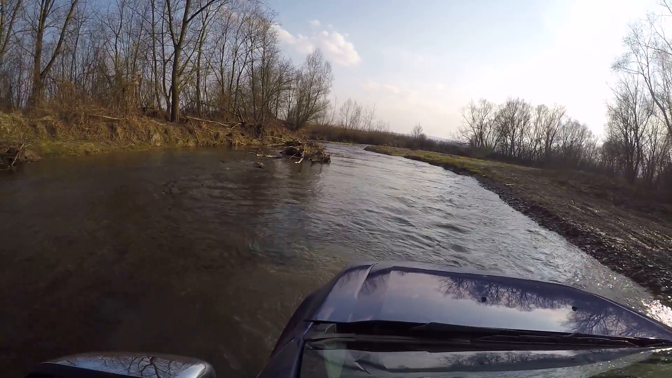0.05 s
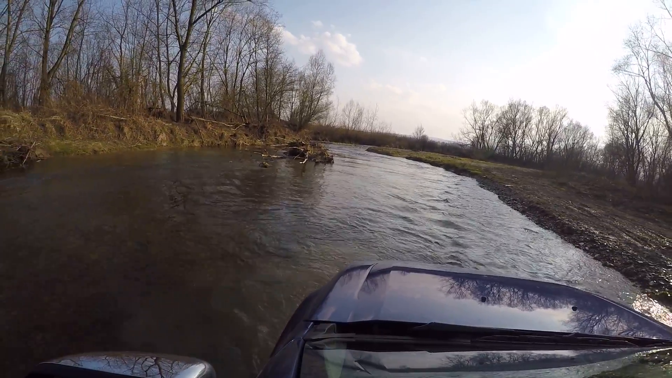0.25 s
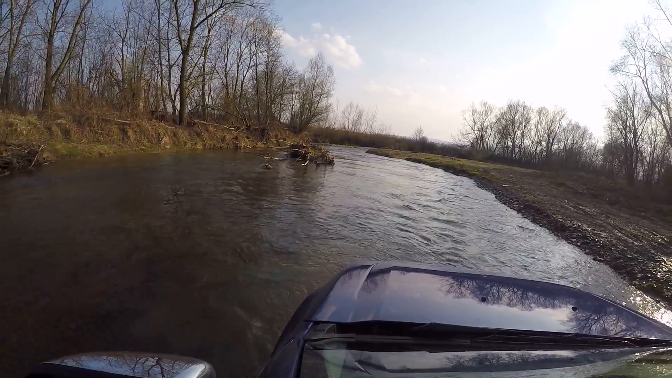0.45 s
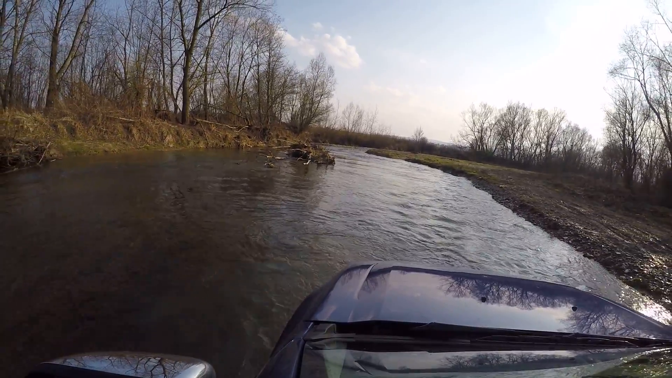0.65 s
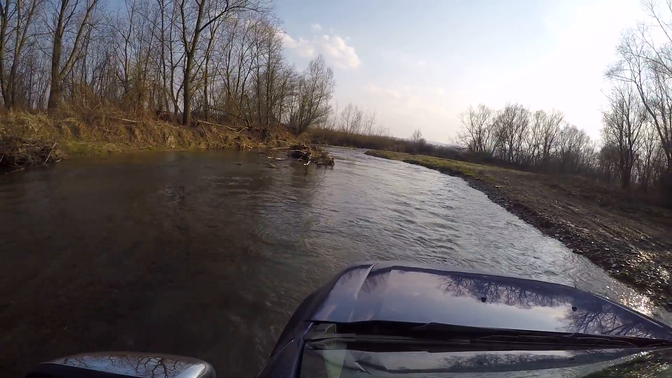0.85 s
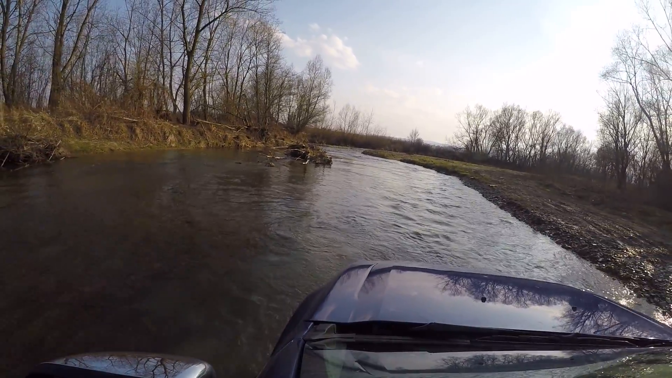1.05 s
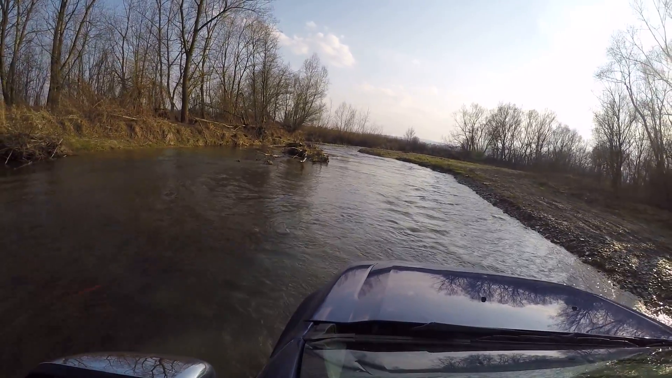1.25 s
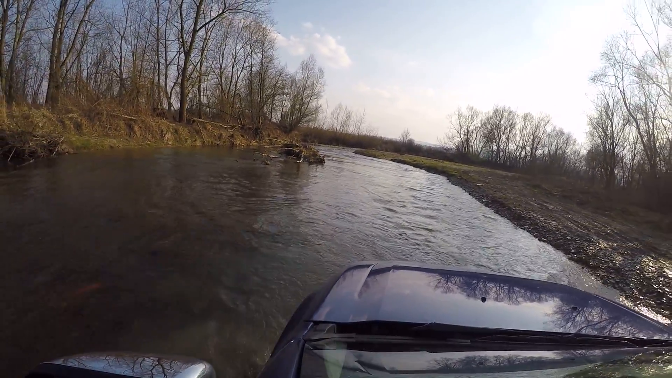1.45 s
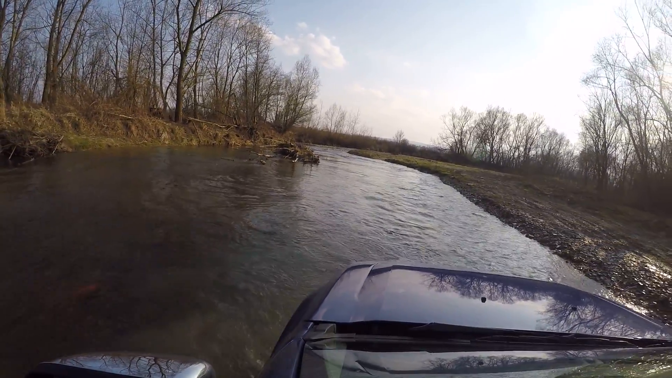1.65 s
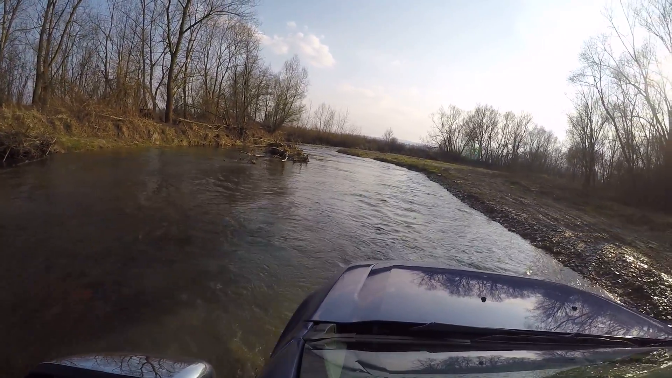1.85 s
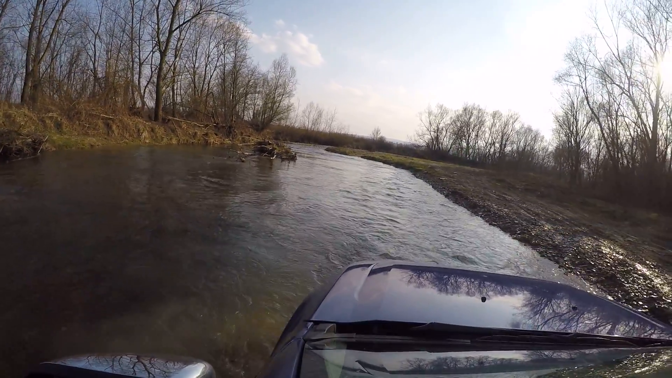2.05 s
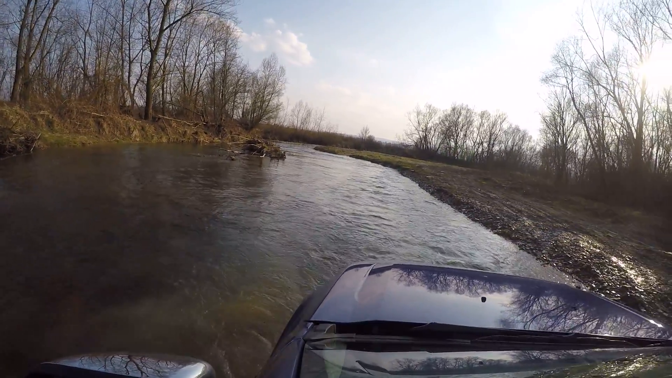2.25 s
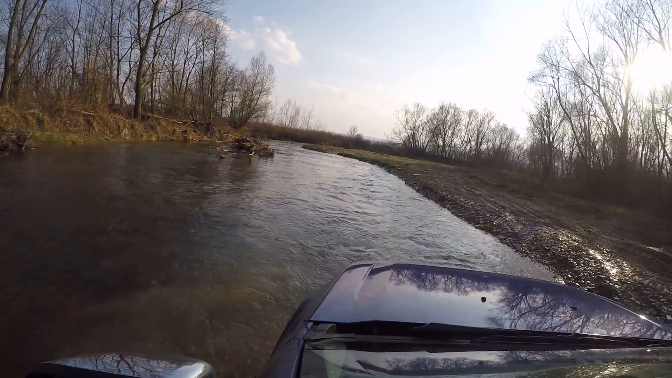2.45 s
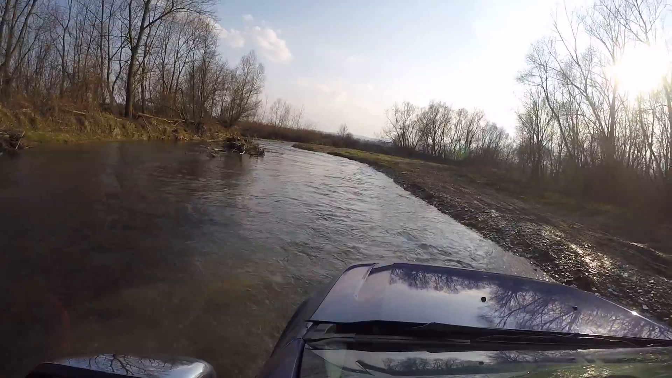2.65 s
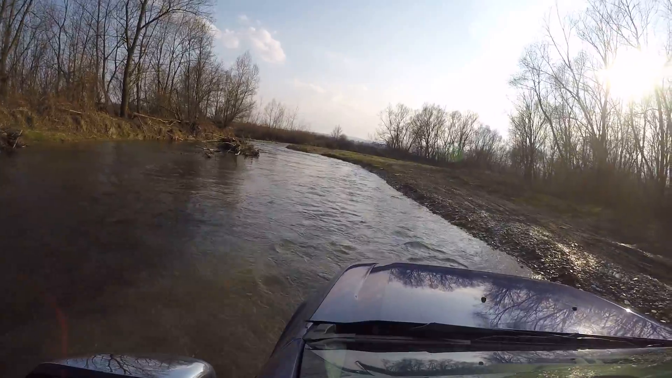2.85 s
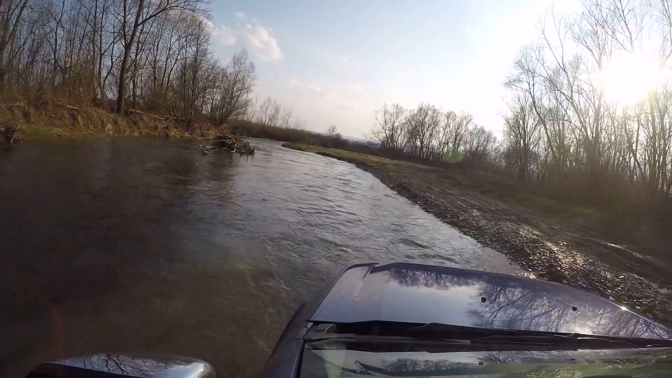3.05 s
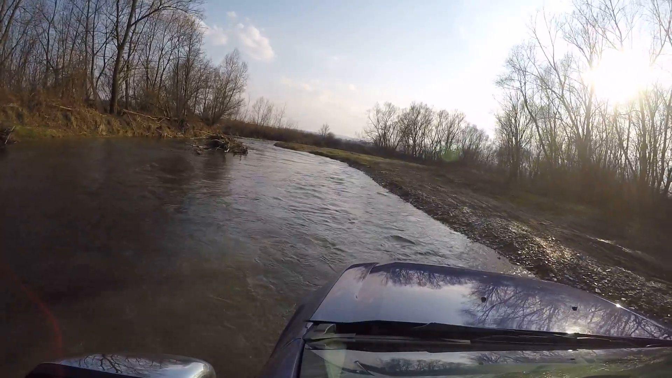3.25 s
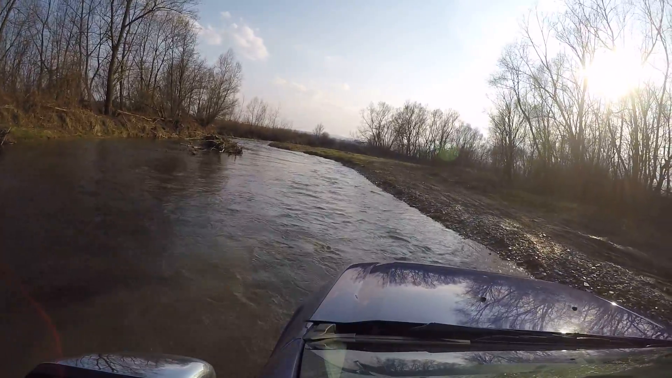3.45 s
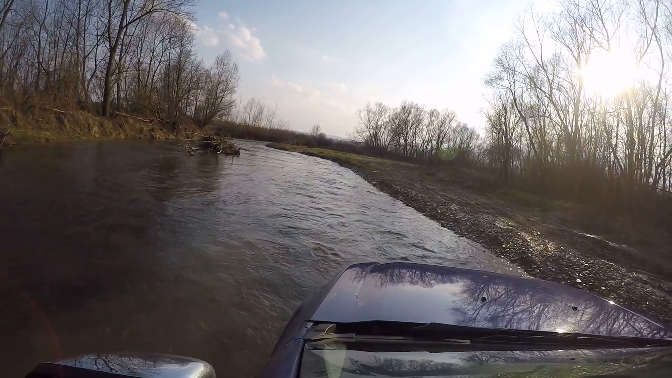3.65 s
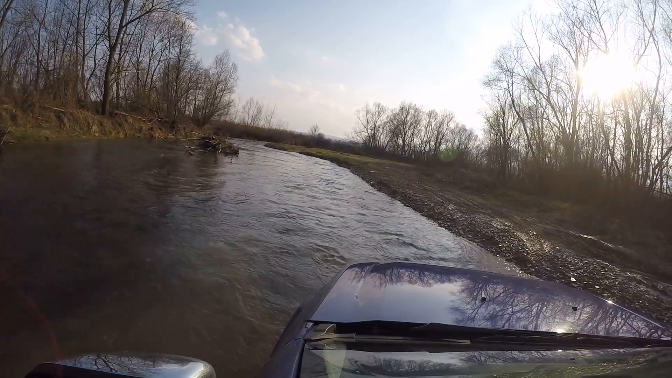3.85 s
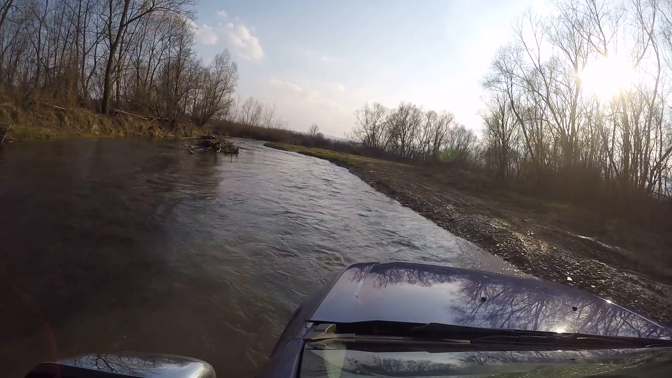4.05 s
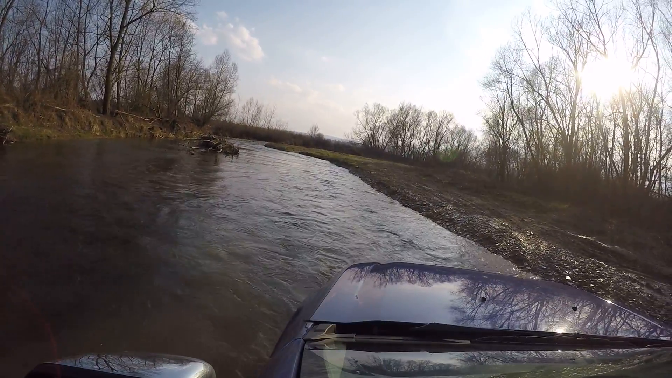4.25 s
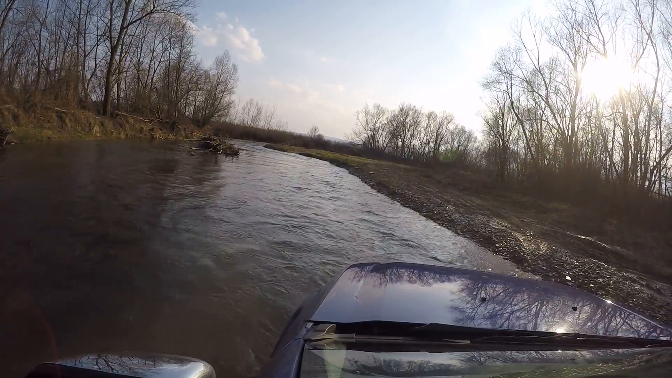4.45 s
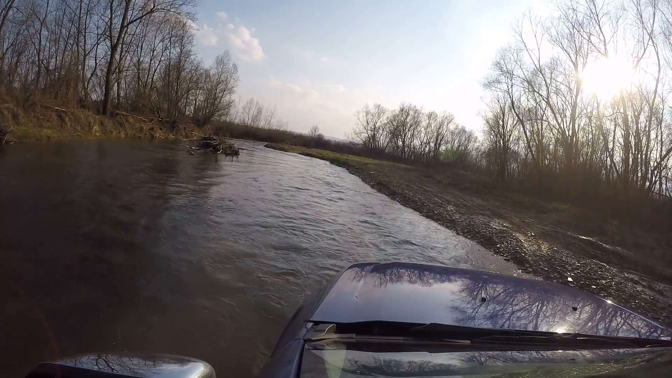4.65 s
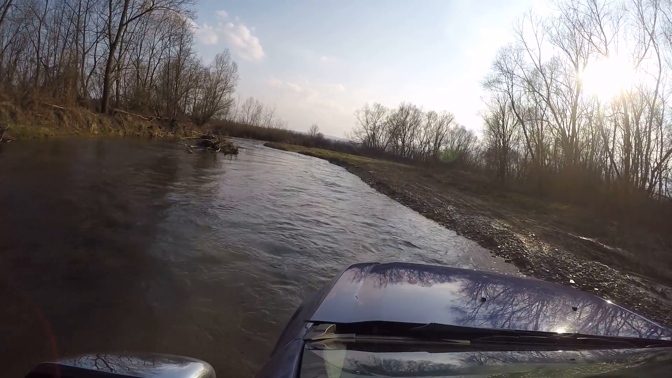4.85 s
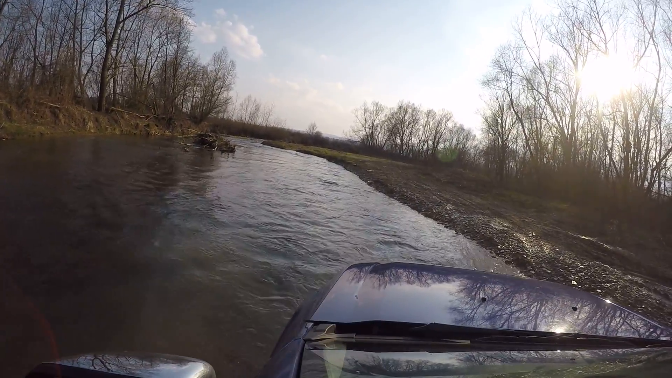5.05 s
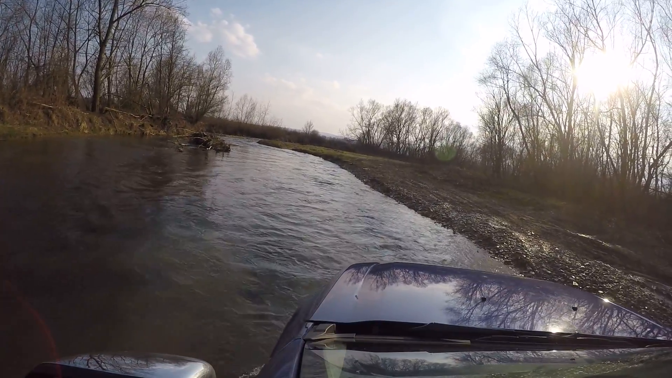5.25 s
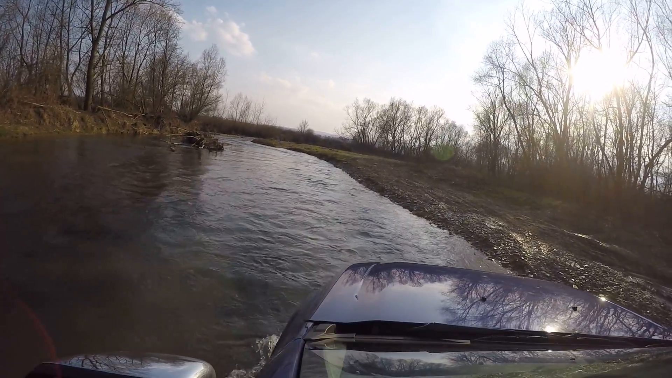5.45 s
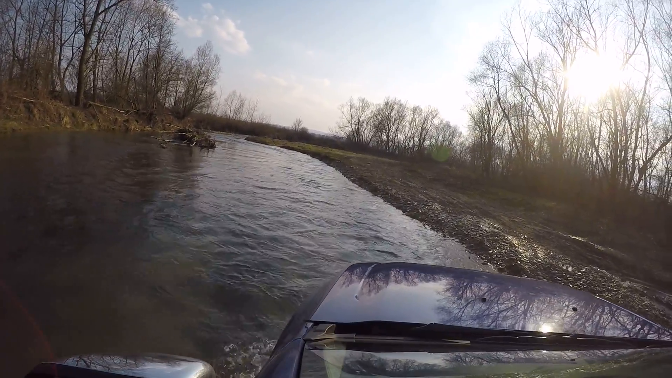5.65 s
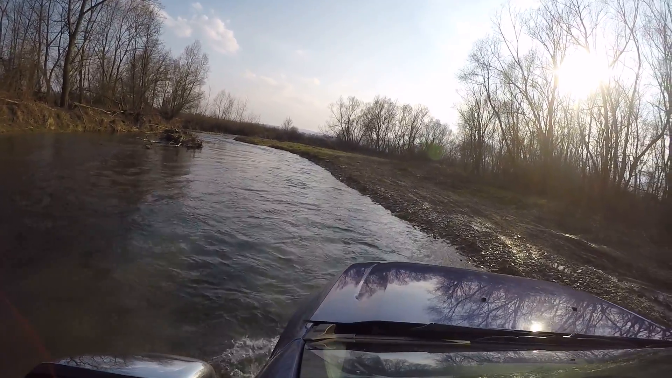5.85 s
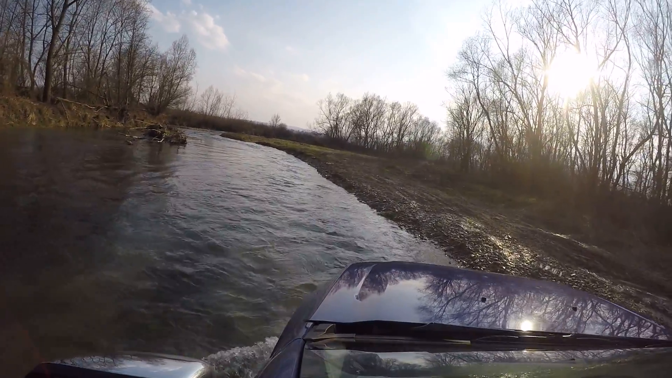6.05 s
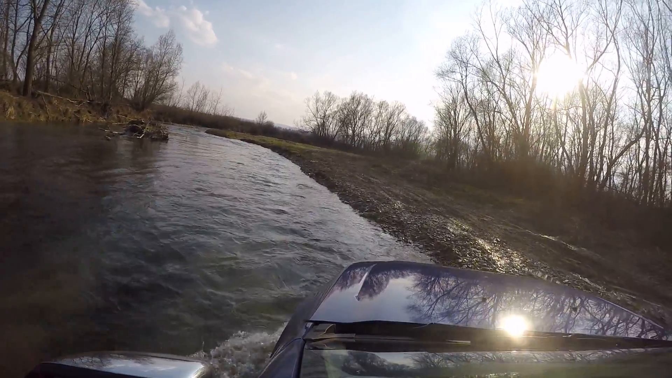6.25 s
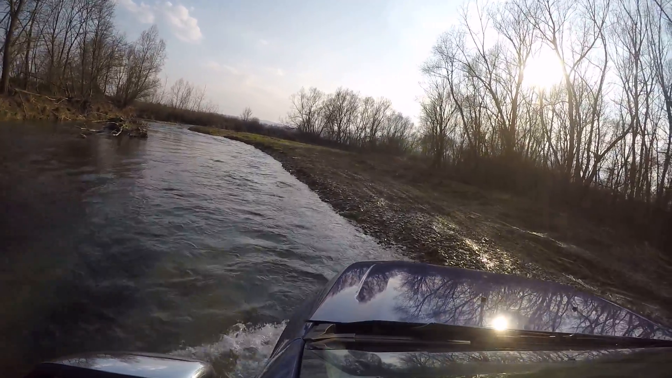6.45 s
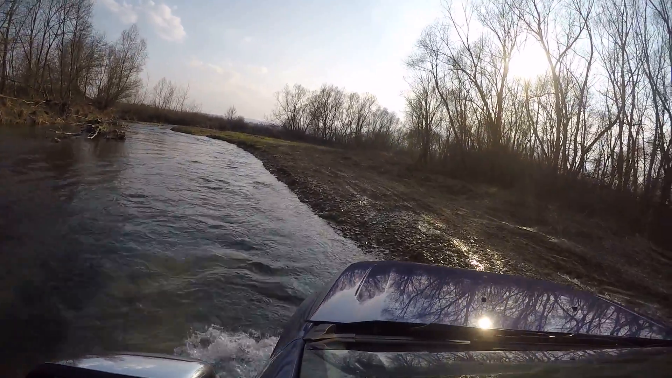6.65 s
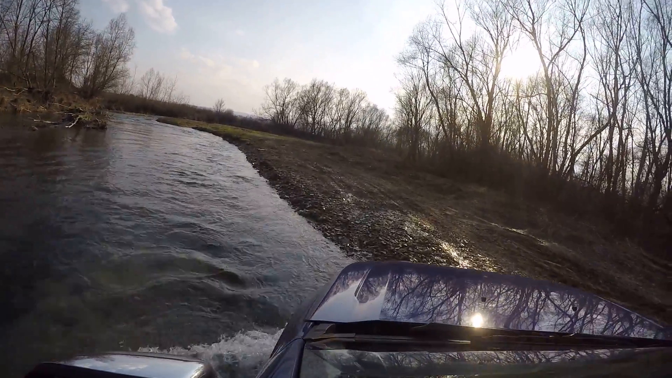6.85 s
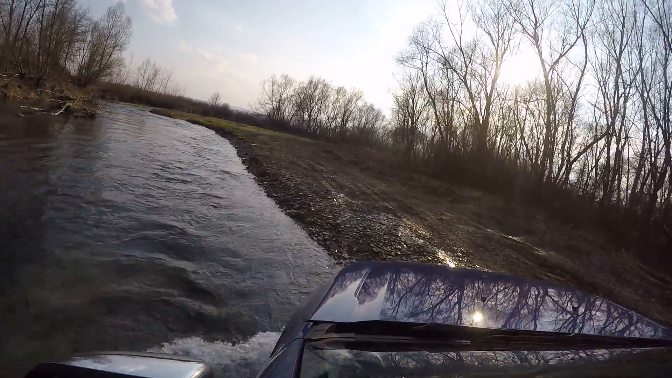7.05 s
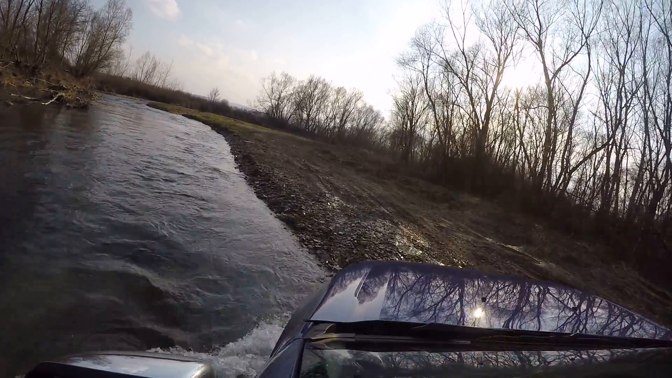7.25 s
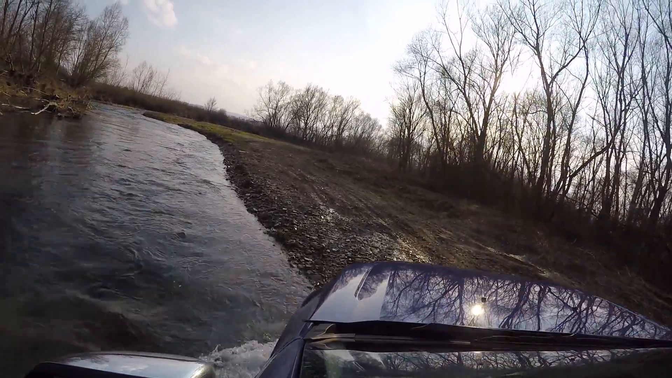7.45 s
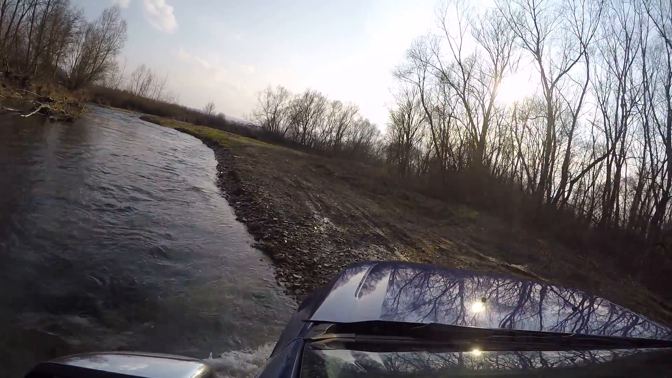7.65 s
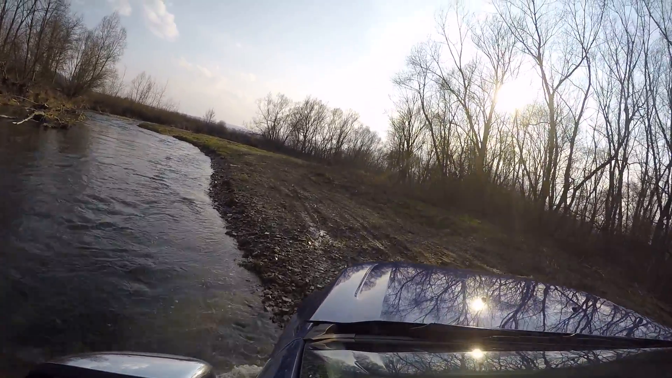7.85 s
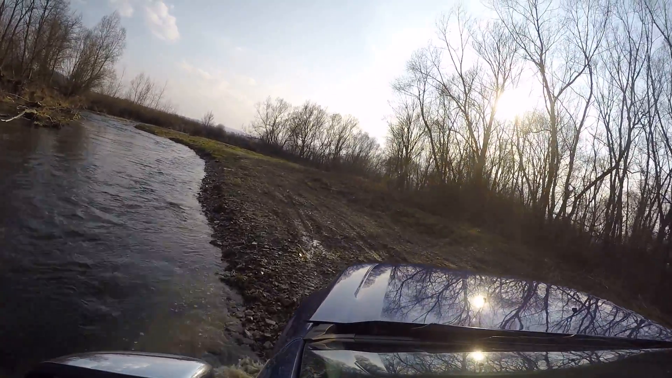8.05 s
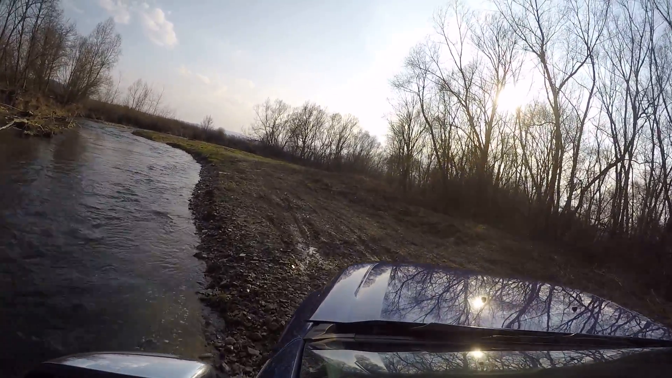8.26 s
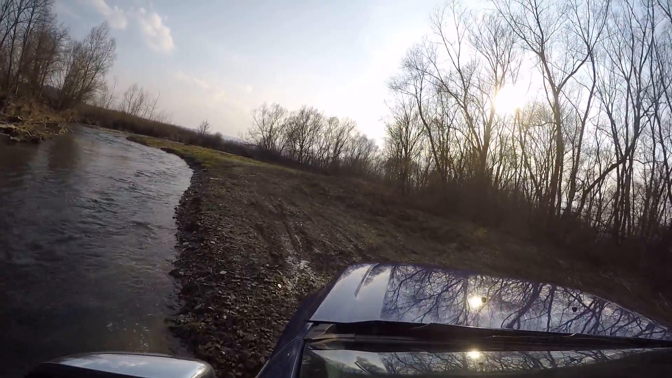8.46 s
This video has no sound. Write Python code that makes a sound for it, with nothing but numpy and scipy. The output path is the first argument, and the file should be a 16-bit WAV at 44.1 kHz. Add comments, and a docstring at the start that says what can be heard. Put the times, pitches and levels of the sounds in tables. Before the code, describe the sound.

Heard from on the truck outdoors, a deep engine throbs near idle above a low, bumpy tyre rumble. River stones give dull knocks while water only trickles and plips. After a quieter, smoother stretch around three to four seconds, the engine revs up, stones crunch and thud, and the water swells into a rushing bow wave with bright spray lasting to the end.

```python
"""An engine plods near idle over a low rumble of tyres: a pickup wades along a shallow stony river.
Each engine firing feeds a deep tone with overtones and shakes the body panels; later it pulls harder.
Shaped noise makes the tyre rumble, and short fading rings make the knocks of river stones.
Ringing bubbles and noise make the water, which swells from trickle and drips to a bow wave of spray.
Single splashes, two faint gliding whistles and a soft hiss complete the scene."""
import sys
import numpy as np
from scipy import signal
from scipy.fft import rfft, irfft, next_fast_len
from scipy.io import wavfile

SR = 44100
rng = np.random.default_rng(int(sys.argv[2]) if len(sys.argv) > 2 else 0)


def waveform_to_disk(signal):
    """Save audio, clipped to [-1, 1], as 16-bit WAV at the path in sys.argv[1]."""
    frames = np.transpose(np.atleast_2d(signal))
    scaled = np.clip(frames, -1, 1) * 32767
    samples = np.round(scaled).astype(np.int16)
    wavfile.write(sys.argv[1], SR, samples)


N = 375291   # length of the scene in samples


def from_db(db):
    """Turn decibels into a gain."""
    return 10 ** (np.asarray(db) / 20)


def rms_one(x):
    """Scale a sound to unit power."""
    return x / np.sqrt(np.mean(x ** 2) + 1e-20)


def in_time(rows):
    """Draw straight lines between the rows of a table: one curve per column, sample by sample."""
    seconds, *columns = np.transpose(rows)
    return [np.interp(np.arange(N) / SR, seconds, column) for column in columns]


def drift(rate):
    """Random wander of spread 1; a higher rate (Hz) wanders faster."""
    # computed at every 40th sample; the first 2000 values only let the filter settle
    r = np.exp(-80 * np.pi * rate / SR)
    noise = rng.standard_normal(N // 40 + 2002)
    slow = signal.lfilter([1], [1, -2 * r, r * r], noise)[2000:]
    return np.interp(np.arange(N) / 40, np.arange(len(slow)), rms_one(slow))


def colour(x, spectrum):
    """Filter a sound by a smooth curve over pitch, fading beyond its ends; unit power."""
    size = next_fast_len(N)
    hz, db = np.transpose(spectrum)
    bins = np.maximum(np.arange(size // 2 + 1) * SR / size, 1)
    gain = from_db(np.interp(np.log(bins), np.log(hz), db))
    gain *= np.minimum(bins / hz[0], 1)
    gain *= np.minimum(hz[-1] / bins, 1) ** 2
    return rms_one(irfft(rfft(x, size) * gain, size)[:N])


def resonance(x, hz, width):
    """Let a sound ring at one pitch: a two-pole resonance with gain 1 at its peak."""
    r = np.exp(-np.pi * width / SR)
    poles = [1, -2 * r * np.cos(2 * np.pi * hz / SR), r * r]
    return signal.lfilter(np.array([1, 0, -1]) * (1 - r * r) / 2, poles, x + 1e-18)


def add(out, s, sound):
    """Mix a short sound in at time s (seconds)."""
    at = max(int(s * SR), 0)
    out[at:at + len(sound)] += sound[:N - at]


def bubbles(per_s, low_hz, high_hz, sharpness, spread_db, count):
    """Bubbles and drops of random size, each ringing briefly at one of many pitches; unit power."""
    sizes = from_db(spread_db * np.minimum(rng.exponential(1, N), 4.5)) * rng.choice([-1, 1], N)
    # dividing by the root of the rate keeps dense and sparse bubbles equally strong
    clicks = sizes * (rng.random(N) < per_s / SR) / np.sqrt(per_s)
    dealt = rng.integers(0, count, N)
    pitches = np.geomspace(low_hz, min(high_hz, SR / 2), count)
    return rms_one(sum(resonance(clicks * (dealt == k), hz, hz / sharpness)
                       for k, hz in enumerate(pitches)))


# How fast the engine turns. Each row: time in seconds, firings per second.
ENGINE_SPEED = [(0, 33.1), (.85, 31.7), (1.09, 34.5), (1.99, 33.6), (2.3, 36.5), (2.96, 32.9), (3.75, 31.8),
                (4.1, 32.2), (4.3, 34.4), (4.52, 38.2), (5.12, 40.4), (5.28, 44), (5.58, 45.6),
                (5.76, 39.4), (6.03, 40.5), (6.24, 48.6), (6.71, 48.8), (7.16, 42.9), (7.75, 46.2),
                (8.1, 54.6), (8.51, 58.5)]
# How loud the deep firing tone is, with its brief dips. Each row: time in seconds, level in dB.
FIRING_TONE = [(0, -21), (.45, -29), (.62, -16.5), (.78, -37), (.97, -27), (1.06, -31), (1.2, -20.5),
               (1.4, -31), (2.2, -27), (2.48, -33), (2.85, -31.5), (3.3, -25), (4.05, -31), (4.62, -23.5),
               (5.13, -22), (5.3, -25.5), (5.7, -29.5), (5.87, -17), (6.13, -30), (6.28, -16.5),
               (6.55, -19.5), (6.78, -23.5), (6.92, -31), (7.03, -16), (7.2, -27.5), (7.5, -22),
               (7.64, -28), (7.8, -18), (8.06, -22.5), (8.25, -16.5), (8.51, -16)]
# How loud the panels drone. Each row: time in seconds, level in dB.
DRONE = [(0, -33), (.9, -39.5), (2.2, -41.5), (2.7, -47), (3.4, -61), (4.1, -52), (4.42, -41), (4.9, -35.5),
         (5.4, -30.5), (5.8, -37.5), (6.4, -31.5), (7.1, -32.5), (7.65, -38), (8.0, -29), (8.51, -28.5)]
# Exhaust overtones. Each row: multiple of the firing rate, relative level in dB.
OVERTONES = [(2, -1), (3, -12), (4, -14.5), (5, -18), (6, -12.5)]
# Body panels that the engine shakes. Each row: pitch in Hz, width in Hz, relative level in dB.
PANELS = [(160.5, 9.8, -4), (194, 12, -5), (248.6, 6.2, 0.5), (302, 19, -4.5), (349.8, 36, 2.5),
          (370.4, 17.6, 7), (427, 28, -1), (510, 38, -7.5), (562, 45, -12.5)]
IDLE_HZ, IDLE_TONE_DB = 32, -28   # firings per second and firing tone at idle
# overtones: base level at idle (dB), dB per dB of firing tone, dB per octave of revs
OVERTONE_DB, OVERTONE_FOLLOWS, OVERTONE_DB_PER_OCTAVE = -35.5, 0.3, -0.5
# flutter of the firing tone: spread on a smooth bed (dB), added spread per dB of rumble
FLUTTER_DB, FLUTTER_FOLLOWS = 0.4, 0.05


def engine(uneven_db=3.0, rough=0.16, waver_db=1.5):
    """Four cylinders fire in turn: a deep exhaust tone, its overtones, and a drone from the panels."""
    firing_hz, = in_time(ENGINE_SPEED)
    tone_db, = in_time(FIRING_TONE)
    drone_db, = in_time(DRONE)
    overtone_db = OVERTONE_DB + OVERTONE_FOLLOWS * (tone_db - IDLE_TONE_DB)
    overtone_db += OVERTONE_DB_PER_OCTAVE * revs()
    flutter_db = FLUTTER_DB + FLUTTER_FOLLOWS * bumpiness()
    firings = np.cumsum(firing_hz * (1 + .004 * drift(6))) / SR   # running count, slightly unsteady
    tone = from_db(tone_db + flutter_db * drift(2.9)) * np.sin(2 * np.pi * firings)
    overtones = np.zeros(N)
    for multiple, db in OVERTONES:
        wave = np.sin(2 * np.pi * (round(multiple) * firings + rng.random()))
        overtones += from_db(db + waver_db * drift(2.2)) * wave
    # each cylinder has its own strength, and no two firings are quite alike
    at = np.flatnonzero(np.diff(np.floor(firings)))
    cylinders_db = np.array([0.19, -0.86, 0.71, -1.7]) * uneven_db
    kicks = np.zeros(N)
    kicks[at] = from_db(np.resize(cylinders_db, len(at))) * (1 + rough * rng.standard_normal(N)[at])
    # neighbouring panels swing in opposite directions
    drone = rms_one(sum((-1) ** k * from_db(db) * resonance(kicks, hz, width)
                        for k, (hz, width, db) in enumerate(PANELS)))
    drone = signal.sosfilt(signal.butter(8, 620, fs=SR, output="sos"), drone)
    return np.sqrt(2) * (tone + from_db(overtone_db) * overtones) + from_db(drone_db) * drone


def revs():
    """Engine speed in octaves above idle."""
    return np.log2(in_time(ENGINE_SPEED)[0] / IDLE_HZ)


# How rough the river bed is under the tyres. Each row: time in seconds, rumble level in dB.
BED = [(0, -31), (.45, -28.5), (1.85, -29.5), (2.1, -31), (2.82, -30.5), (3.05, -38), (4.05, -41),
       (4.6, -38), (5.0, -31), (5.55, -30), (5.85, -24.5), (6.65, -23.5), (7.15, -24.5), (7.6, -24.5),
       (8.0, -20.5), (8.51, -23)]
# How strongly the truck rocks. Each row: time in seconds, level in dB.
SWAY = [(0, -34), (.4, -25), (1.0, -29), (1.7, -22), (2.4, -40), (3.0, -39), (3.7, -33.5), (4.15, -36),
        (4.6, -39), (5.4, -51), (5.9, -29), (6.5, -30), (7.5, -38), (8.51, -27)]
# Tone colours of the rumble and the rocking. Each row: pitch in Hz, relative level in dB.
RUMBLE_SPECTRUM = [(10, -37), (18, -12), (30, -8), (60, -6), (80, -8.5), (105, -12), (160, -10),
                   (230, -16.5), (400, -44)]
SWAY_SPECTRUM = [(8, -16), (19, 0), (28, -1.5), (52, -10), (75, -17), (120, -32)]
# Big stones knock under the tyres. Each row: start in seconds, knock level in dB, ring pitch in Hz,
# crunch level in dB.
KNOCKS = [(0.431, -19.5, 70.5, -48), (1.117, -16.5, 84.5, -37), (1.154, -13.5, 59.6, -45),
          (1.872, -19.5, 223, -26), (1.897, -20.5, 240, -30), (2.584, -27, 167, -38),
          (2.772, -20.5, 182, -35), (2.796, -23, 135, -42), (2.918, -29, 320, -31),
          (2.934, -35, 387, -30.5), (3.143, -18.5, 204, -29), (3.172, -19, 61.5, -33),
          (5.668, -19, 167, -21), (5.689, -12, 145, -19), (5.834, -24, 210, -21), (5.92, -14, 244, -25),
          (6.304, -11, 211, -19), (6.428, -23, 144, -23), (6.54, -20, 179, -17.5), (6.622, -20, 130, -39),
          (7.464, -20, 165, -23), (7.804, -18.5, 213, -34)]
# How a knock rings through the suspension. Each row: multiple of the ring pitch, relative level in dB,
# time to fade by 60 dB in seconds.
KNOCK_MODES = [(.75, -14, .07), (1, 5.5, 0.094), (1.22, -1, 0.078), (1.7, -13, 0.09), (2.3, -17, 0.042)]
SMOOTH_BED_DB = -38   # rumble on a smooth bed
# a shifting stone grinds on its neighbours, muffled by the water: band (Hz), decay (s)
CRUNCH_LOW_HZ, CRUNCH_HIGH_HZ, CRUNCH_DECAY_S = 167, 507, 0.012


def tyres(lurch_db=1.0):
    """Cobbles shake and rock the truck as noise; big stones shift with a crunch and a dull ringing knock."""
    rumble_db, = in_time(BED)
    sway_db, = in_time(SWAY)
    rumble = colour(rng.standard_normal(N), RUMBLE_SPECTRUM)
    out = from_db(rumble_db + lurch_db * drift(1.8)) * rumble
    out += from_db(sway_db) * colour(rng.standard_normal(N), SWAY_SPECTRUM)
    t = np.arange(SR // 4) / SR
    muffled = signal.butter(4, [CRUNCH_LOW_HZ, CRUNCH_HIGH_HZ], "band", fs=SR, output="sos")
    soft_start = (1 - np.exp(-t / 0.0025)) ** 2   # rubber softens the blow
    for s, db, hz, crunch_db in KNOCKS:
        ring = sum(from_db(mode_db - 60 * t / t60) * np.sin(2 * np.pi * hz * ratio * t)
                   for ratio, mode_db, t60 in KNOCK_MODES)
        grind = rms_one(signal.sosfilt(muffled, rng.standard_normal(len(t))))
        crunch = grind * np.exp(-t / CRUNCH_DECAY_S)
        add(out, s, from_db(db) * ring * soft_start + from_db(crunch_db) * crunch)
    return out


def bumpiness():
    """How much rougher the bed is than a smooth one, in dB."""
    return in_time(BED)[0] - SMOOTH_BED_DB


# How much water the truck pushes aside. Each row: time in seconds, wash level in dB.
FLOW = [(0, -47.5), (2.25, -48.5), (2.6, -51), (3.15, -53), (4.15, -53.5), (4.5, -51), (4.85, -46),
        (5.3, -41.5), (6.2, -37), (6.62, -34.5), (7.4, -36), (7.57, -37), (8.51, -37)]
# The bow wave breaks against the front. Each row: time in seconds, swell in dB.
BREAKERS = [(6.55, 0.5), (6.75, 0.5), (7.08, 1.2), (7.41, 2)]
# Tone colours of churn, wash and spray. Each row: pitch in Hz, relative level in dB.
CHURN_SPECTRUM = [(70, -17), (120, -5), (170, -9), (260, 1.5), (360, 2.5), (450, 1), (520, -5.5),
                  (580, -7.5), (650, -25), (900, -21)]
WASH_SPECTRUM = [(300, -37), (600, 5.5), (880, 3.5), (1080, 1), (1250, -2), (2000, -4.5), (2650, -9),
                 (3100, -9.5), (3400, -15.5), (5000, -14.5), (9000, -28.5)]
SPRAY_SPECTRUM = [(900, -0.5), (2000, -10), (3200, -4), (4300, 0), (5600, -3), (8000, -8), (9500, -19),
                  (11500, -23), (13600, -19.5), (15500, -21)]
GENTLE_WASH_DB = -49
# churn: base level for a gentle wash on a smooth bed (dB), dB per dB of wash
CHURN_DB, CHURN_FOLLOWS = -38.5, 0.68
CHURN_PER_BED_DB = 0.2487   # a rough bed stirs the water more: dB per dB of rumble
# spray: base level for a gentle wash at idle (dB), dB per dB of wash
SPRAY_DB, SPRAY_FOLLOWS = -57, 1.344
SPRAY_DB_PER_OCTAVE = 3   # faster wheels fling more spray; follows the revs
CHURN_LEAD_S, SPRAY_LAG_S = 0.15, 0.29   # water churns under the body first; the spray builds up later
# a strong bow wave breaks into mist: delay (s), surge where it starts (dB), further surge to full mist (dB)
MIST_LAG_S, MIST_FROM_DB, MIST_RANGE_DB = 0.84, 2.5, 8.5
BREAKER_S = 0.065   # time each breaker takes to swell and to fade


def water(slosh_db=0.71, dull_hz=8500):
    """Big air pockets gurgle under the body, the wash rushes along the sides, drops patter down."""
    wash_db, = in_time(FLOW)
    churn_db = CHURN_DB + CHURN_FOLLOWS * surge(-CHURN_LEAD_S) + CHURN_PER_BED_DB * bumpiness()
    spray_db = spray_level()
    slosh = breakers() + slosh_db * drift(18)   # wavelets lift wash and spray together
    gurgle = bubbles(1400, 108.0, 675.0, sharpness=9.6, spread_db=1.5, count=20)
    churn = from_db(churn_db) * colour(gurgle + 0.78 * rng.standard_normal(N), CHURN_SPECTRUM)
    froth = bubbles(2500, 886, 4170, sharpness=11.6, spread_db=3.0, count=24)
    wash = from_db(wash_db + slosh) * colour(froth + 3 * rng.standard_normal(N), WASH_SPECTRUM)
    # the more water is thrown, the denser the drops, until they merge into a hiss
    drops_per_s = 1600 * from_db(spray_db + 57.0 + 2.5 * drift(15))
    drops = bubbles(drops_per_s, 1513, 17300, sharpness=8.7, spread_db=2.5, count=22)
    spray = colour(drops + rng.standard_normal(N), SPRAY_SPECTRUM)
    # a gentle wash is dull; only a strong bow wave breaks into fine bright mist
    dull = signal.sosfilt(signal.butter(1, dull_hz, fs=SR, output="sos"), spray)
    mist = np.clip((surge(MIST_LAG_S) - MIST_FROM_DB) / MIST_RANGE_DB, 0, 1)
    return churn + wash + from_db(spray_db + slosh) * (mist * spray + (1 - mist) * dull)


def surge(lag_s):
    """How far the wash stood above a gentle one lag_s earlier, in dB."""
    seconds, db = np.transpose(FLOW)
    return np.interp(np.arange(N) / SR - lag_s, seconds, db) - GENTLE_WASH_DB


def spray_level():
    """The spray swells later and more steeply than the wash, and with the revs; in dB."""
    return SPRAY_DB + SPRAY_FOLLOWS * surge(SPRAY_LAG_S) + SPRAY_DB_PER_OCTAVE * revs()


def breakers():
    """Each breaking crest briefly swells the water; in dB."""
    t = np.arange(N) / SR
    return sum(db * np.exp(-((t - s) / BREAKER_S) ** 2) for s, db in BREAKERS)


# Single splashes at set times. Each row: start in seconds, level in dB, centre in Hz, width in Hz.
SPLASHES = [(.635, -47, 3900, 3000), (.766, -48, 2750, 700), (.906, -44, 1970, 600),
            (1.485, -49, 6000, 8000), (1.54, -56, 13000, 3000), (1.552, -46.5, 4470, 4500),
            (1.572, -47, 4500, 2500), (1.762, -46, 3230, 2000), (2.3, -45, 4490, 2000),
            (2.343, -36, 4370, 1800), (2.771, -50, 4800, 3000), (2.969, -47, 4000, 3000),
            (3.302, -51, 5100, 3000), (3.604, -52, 5200, 3000), (3.892, -50, 2750, 600),
            (4.07, -54, 4900, 1800), (5.258, -41, 4200, 2500), (5.369, -42, 3800, 2500),
            (5.493, -41, 4000, 3000), (7.603, -36, 3500, 2500), (7.782, -37, 6600, 4000),
            (7.919, -37, 4000, 3000)]
# small plips fall at random: rate, level above the spray (dB), its spread (dB)
PLIPS_PER_S, PLIP_OVER_SPRAY_DB, PLIP_SPREAD_DB = 11, 4.5, 2
PLIP_LOW_HZ, PLIP_HIGH_HZ, PLIP_WIDTH_HZ = 3400, 6600, 1500
PLIP_CEILING_DB = -48   # limits the level before pitch and chance shift it
PLIP_DB_PER_OCTAVE = -7.5   # the smaller, higher plips are fainter


def splashes(decay_s=0.0056):
    """Single slaps and plips of water: a short fading burst of noise around one pitch."""
    out, t = np.zeros(N), np.arange(SR // 20) / SR
    plip_db = np.minimum(spray_level() + PLIP_OVER_SPRAY_DB, PLIP_CEILING_DB)
    plips = []
    for at in np.flatnonzero(rng.random(N) < PLIPS_PER_S / SR):
        hz = rng.uniform(PLIP_LOW_HZ, PLIP_HIGH_HZ)
        db = plip_db[at] + PLIP_DB_PER_OCTAVE * np.log2(hz / PLIP_LOW_HZ)
        db += PLIP_SPREAD_DB * rng.standard_normal()
        plips.append((at / SR, db, hz, PLIP_WIDTH_HZ))
    for s, db, hz, width in list(SPLASHES) + plips:
        band = signal.butter(2, [hz - width / 2, hz + width / 2], "band", fs=SR, output="sos")
        burst = rms_one(signal.sosfilt(band, rng.standard_normal(len(t))))
        add(out, s, from_db(db) * burst * np.exp(-t / decay_s))
    return out


# Thin whistles from the engine bay glide up. Each row: start in seconds, length in seconds,
# level in dB, first pitch in Hz, last pitch in Hz.
WHISTLES = [(0.851, 0.4, -64, 2810, 3170), (4.58, .24, -63, 2620, 3230)]


def whistle(width_hz=45):
    """An airy, unsteady tone: a narrow band of noise that swells and fades as its pitch glides up."""
    out = np.zeros(N)
    for s, length, db, from_hz, to_hz in WHISTLES:
        progress = np.clip((np.arange(N) / SR - s) / length, 0, 1)
        phase = 2 * np.pi * np.cumsum(from_hz + (to_hz - from_hz) * progress) / SR
        swell = np.sqrt(np.abs(np.sin(np.pi * progress)))
        airy_tone = drift(width_hz) * np.cos(phase) + drift(width_hz) * np.sin(phase)
        out += from_db(db) * swell * airy_tone
    return out


# Tone colour of the background hiss. Each row: pitch in Hz, relative level in dB.
HISS_SPECTRUM = [(1000, 9), (5000, 4.5), (8000, -5), (10000, -5), (13000, -3), (14300, 8), (14800, -7),
                 (15400, -20)]


def hiss():
    """A faint, steady hiss of filtered noise."""
    return from_db(-66.5) * colour(rng.standard_normal(N), HISS_SPECTRUM)


def scene():
    """The truck and the water around it, over a faint hiss."""
    return (engine() + whistle() + tyres() + water() + splashes() + hiss())[None]


# Peaks and dips that ripple the treble. Each row: pitch in Hz, width in Hz, boost or cut in dB.
TREBLE_RIPPLES = [(2760, 650, 7.5), (3940, 970, -1), (4200, 84, 3.5), (7060, 1500, -4.5), (7670, 300, 3),
                  (9300, 600, -1.5), (10200, 560, 2.5)]
CUTOFF_HZ = 15350


def record(dry):
    """Resonances added or subtracted in turn ripple the treble; a steep filter cuts the top."""
    for hz, width, db in TREBLE_RIPPLES:
        dry = dry + (from_db(db) - 1) * resonance(dry, hz, width)
    return signal.sosfilt(signal.ellip(12, .1, 90, CUTOFF_HZ, fs=SR, output="sos"), dry)


dry = scene()
out = record(dry)
waveform_to_disk(out)
```